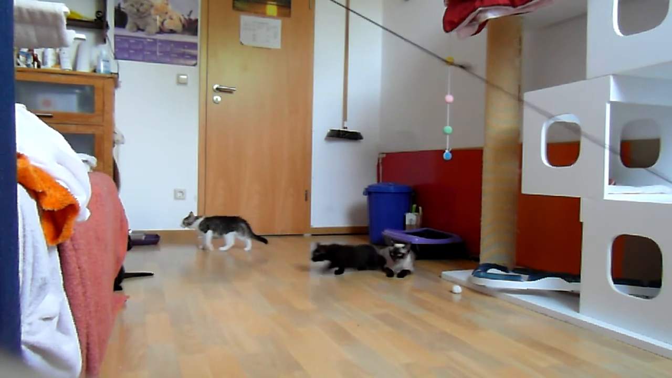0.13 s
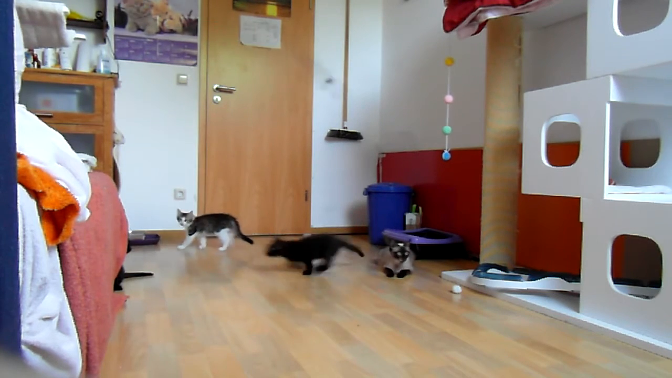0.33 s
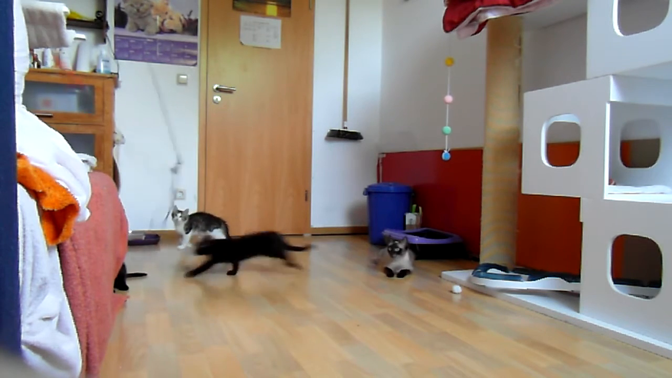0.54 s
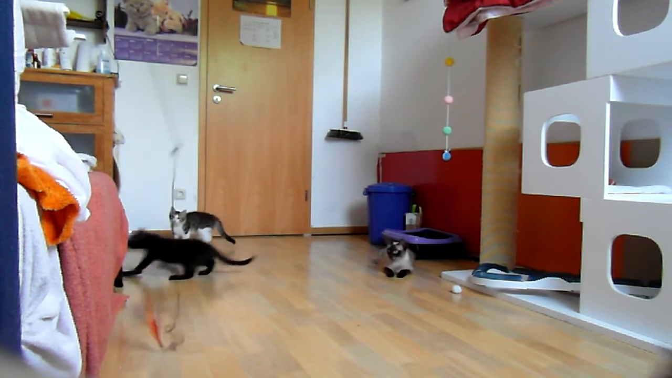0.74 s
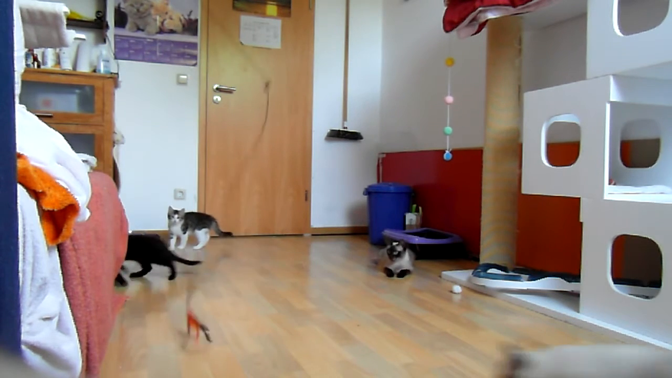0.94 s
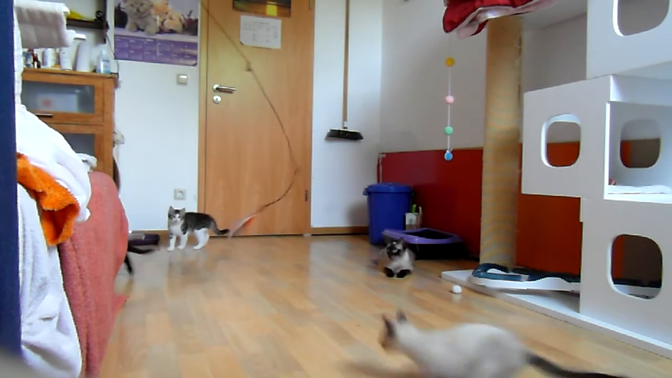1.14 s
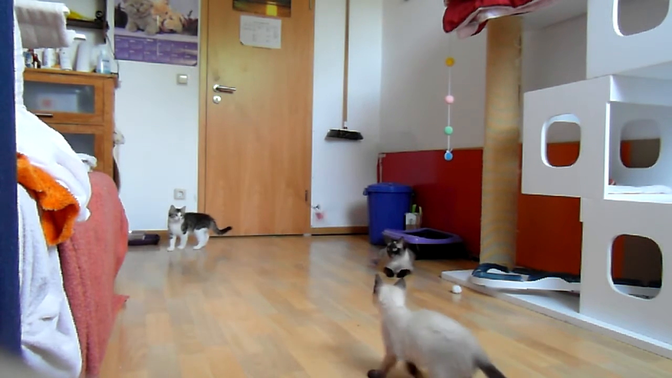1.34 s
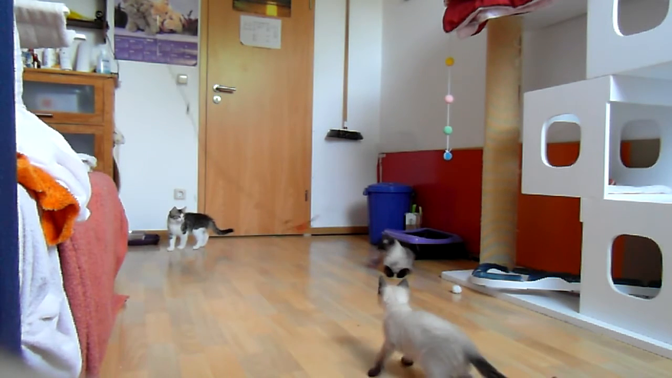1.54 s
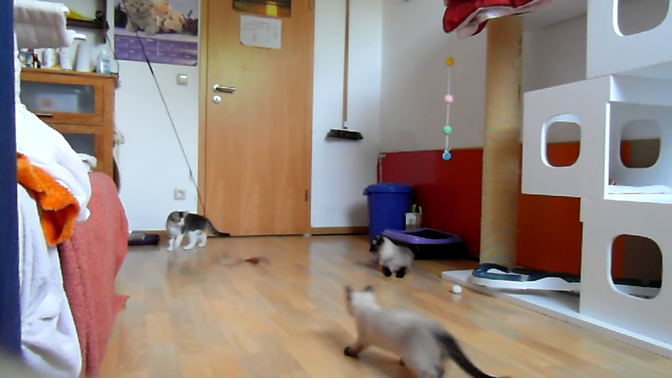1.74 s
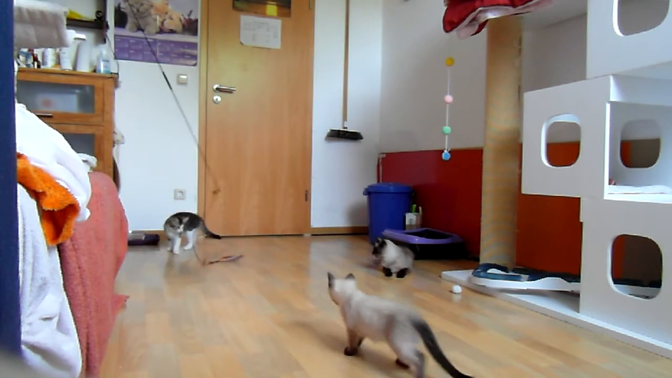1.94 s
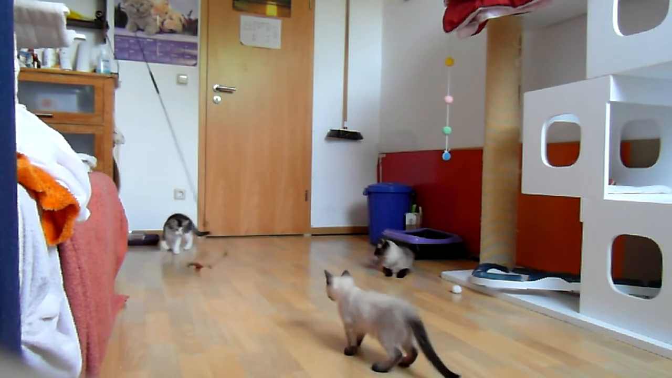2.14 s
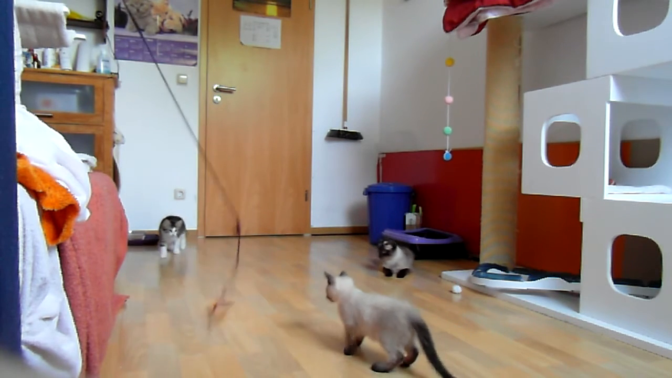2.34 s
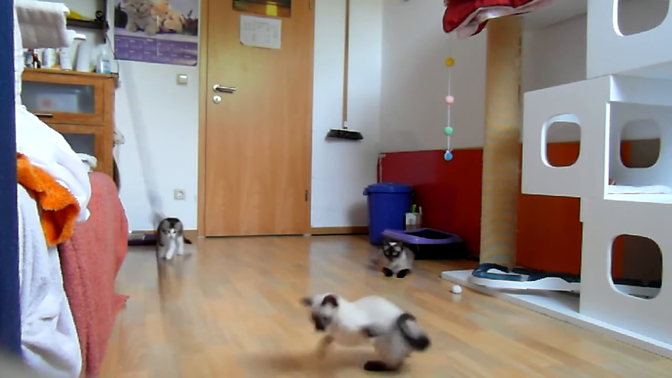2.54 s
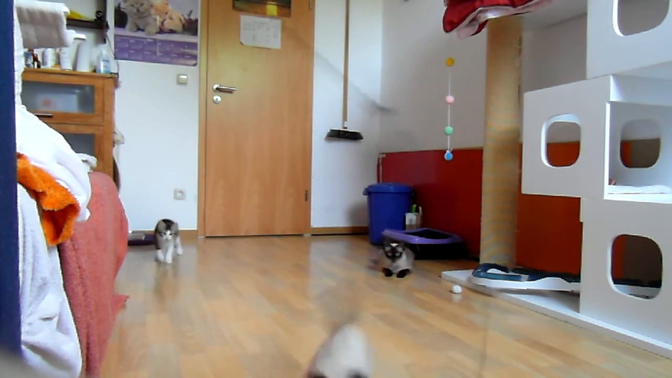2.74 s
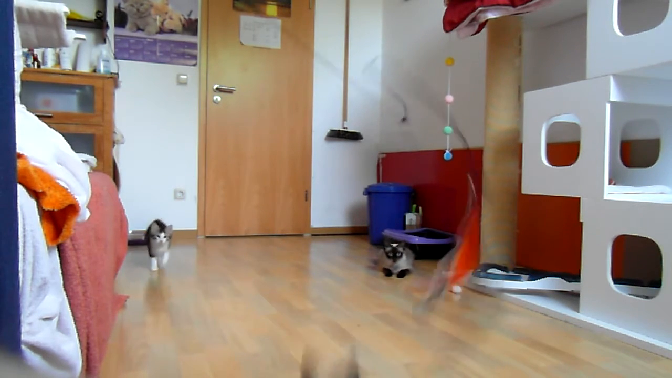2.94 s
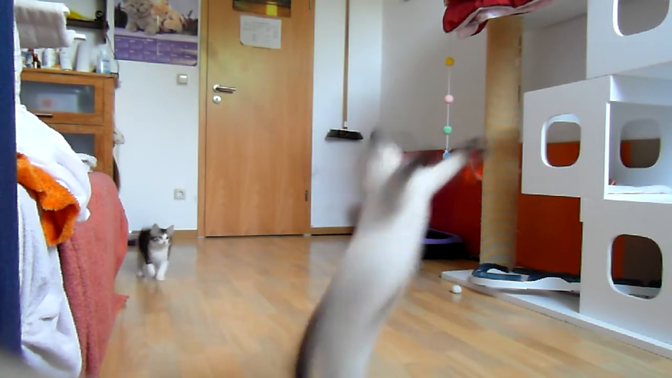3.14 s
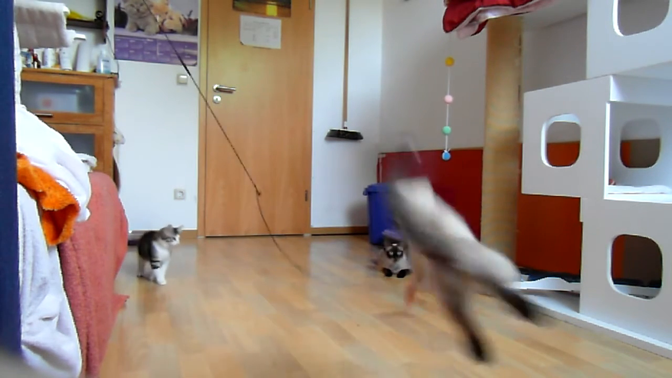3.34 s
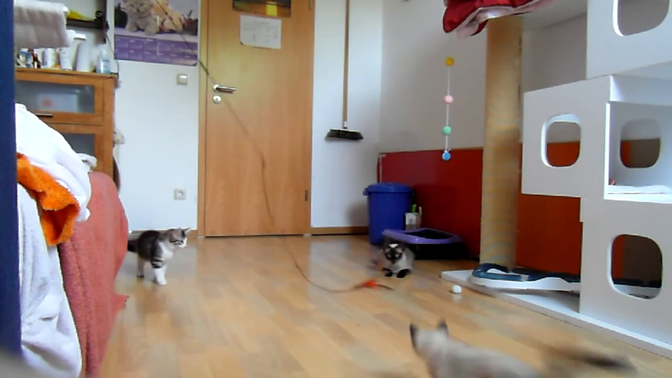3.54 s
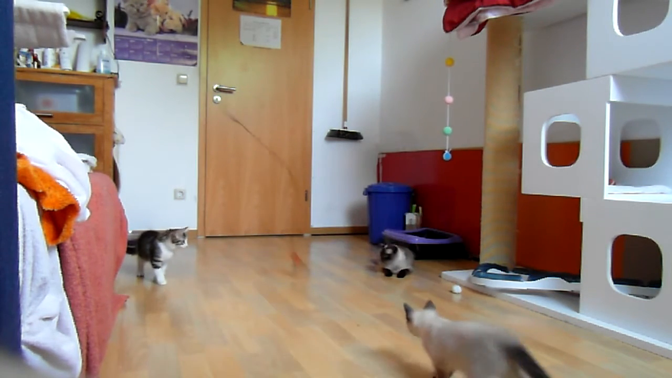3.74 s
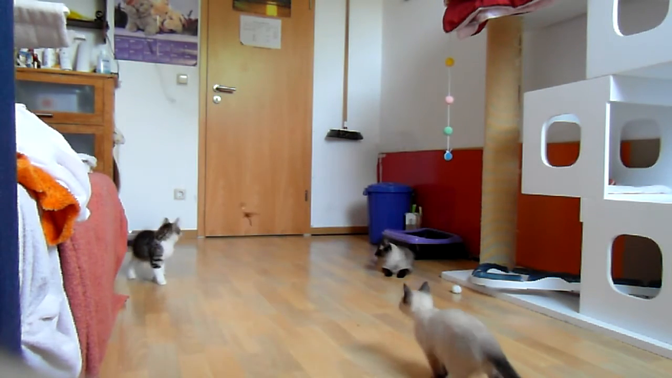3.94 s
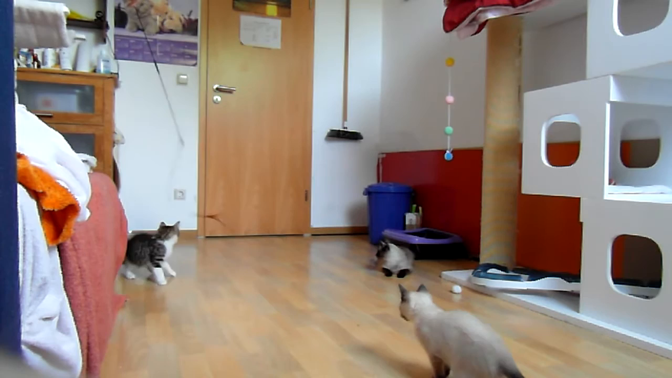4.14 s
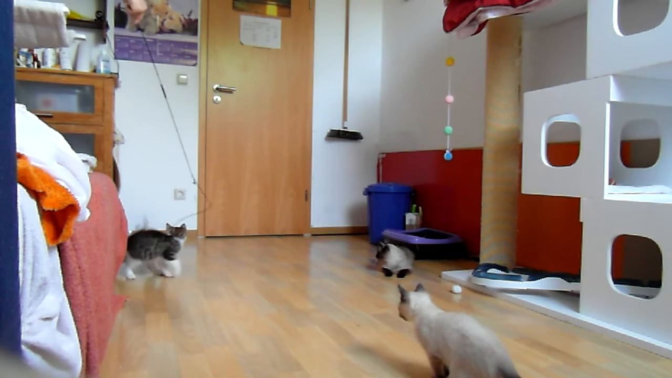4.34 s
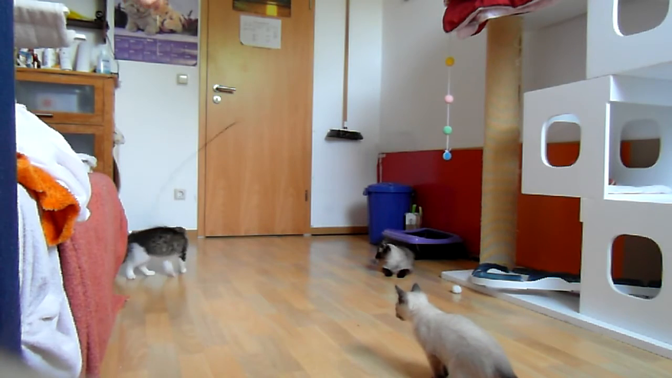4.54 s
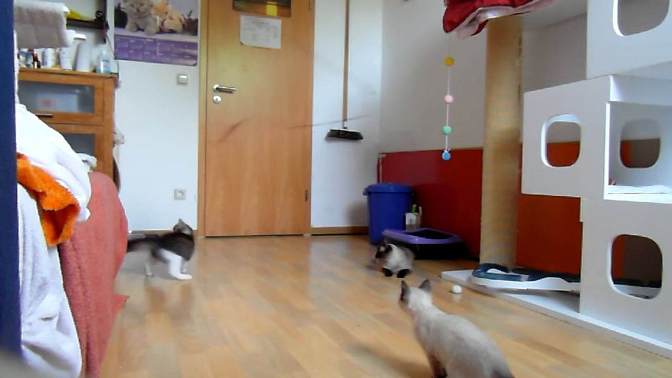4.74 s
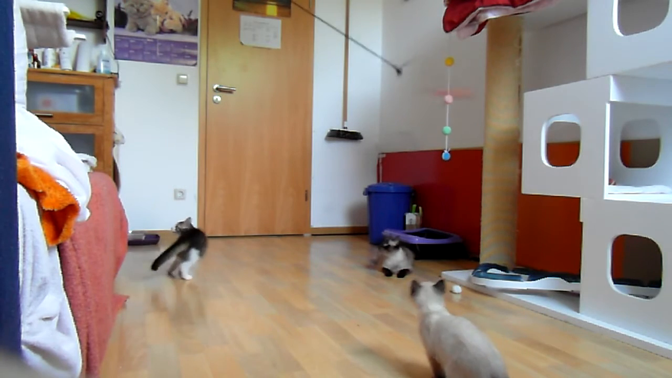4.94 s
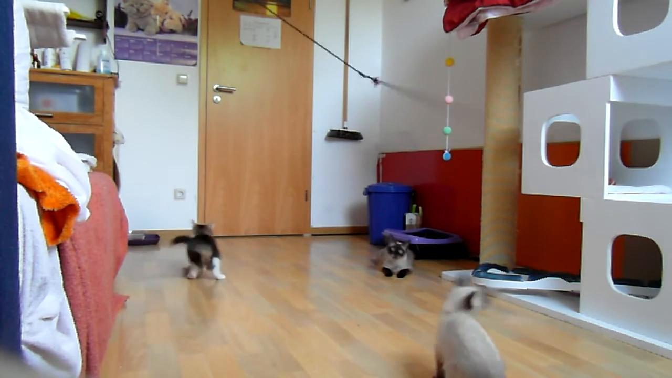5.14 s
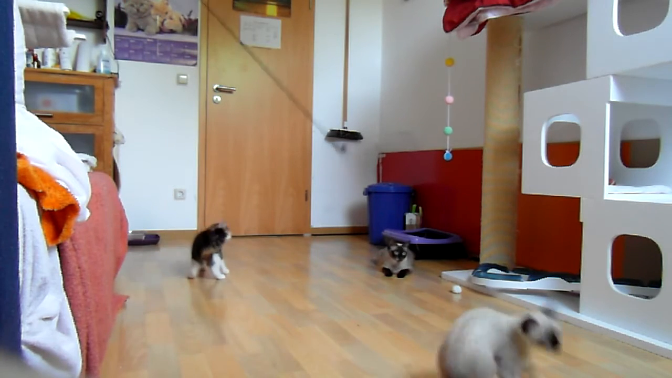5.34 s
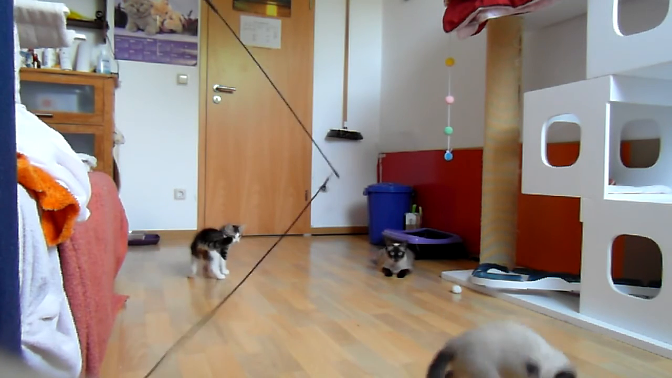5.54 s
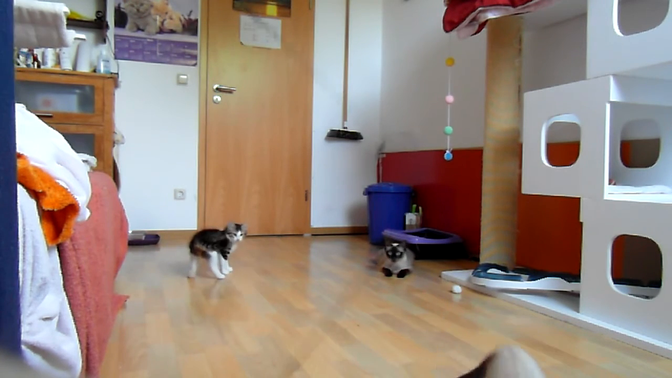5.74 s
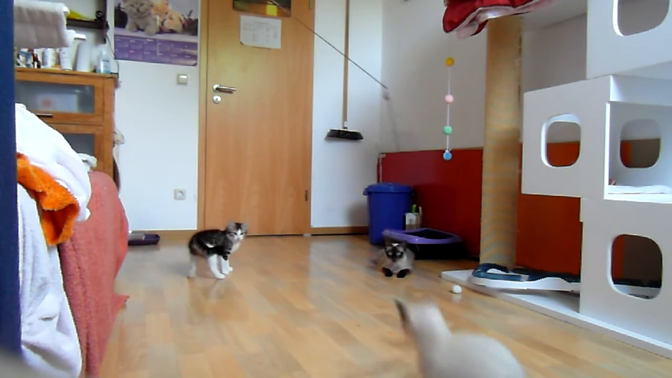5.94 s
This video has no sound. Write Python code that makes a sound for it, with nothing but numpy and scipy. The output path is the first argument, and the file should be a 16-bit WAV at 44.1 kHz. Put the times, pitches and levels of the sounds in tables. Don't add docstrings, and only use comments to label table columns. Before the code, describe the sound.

A small furnished room is heard from a microphone lying near the laminate floor: soft steady hiss, faint low rumble and muffled room murmur. At 0.14 s a kitten lands in a tumble, with a dull thud and clustered knocks; from 0.35 to 0.6 s claws drag brightly, squeak and tick. A quick bound at 1.0 s gives crisp claw cracks and a short skid, and another comes at 1.9 s. Faint scuffs follow near 2.6 s. At 2.95 s the hardest landing slams the boards, with a deep after-thump near 3.2 s. At 3.6 s claws skid sharply, then a hollow heavy thump lands at 3.7 s. Soft steps continue around 4 s, with light ticks at 4.6, 5.1, 5.6 and 5.75 s. Each sound drops abruptly into hiss. The murmur gradually grows, and a distant appliance's narrow hum swells near 5.9 s.

```python
import sys
import numpy as np
from scipy import signal
from scipy.fft import rfft, irfft, next_fast_len
from scipy.io import wavfile
from scipy.ndimage import uniform_filter1d, map_coordinates

SR = 44100
rng = np.random.default_rng(int(sys.argv[2]) if len(sys.argv) > 2 else 0)


def wav_out(sig):
    wavfile.write(sys.argv[1], SR, np.round(np.clip(np.atleast_2d(sig).T, -1, 1) * 32767).astype(np.int16))


def natural_amplitude(level_db):
    exponent = np.asarray(level_db, float) / 20
    return 10 ** exponent


N = 268304


def unit(x):
    return x / np.sqrt(np.mean(x ** 2) + 1e-20)


def along(points, hz):
    f, v = np.transpose(points)
    return np.interp(np.log(hz + 1), np.log(f + 1), v)


def filtered(x, response):
    m = next_fast_len(x.shape[-1] + 8192)
    spectrum = rfft(x, m) * response(np.fft.rfftfreq(m, 1 / SR))
    return irfft(spectrum, m)[..., :x.shape[-1]]


def modes(table):
    def response(f):
        total = 0
        for k, (centre, width, db) in enumerate(table):
            resonance = 1j * f * width / (centre * centre - f * f + 1j * f * width)
            total = total + (-1) ** k * natural_amplitude(db) * resonance
        return total
    return response


def swells(rows):
    t = np.arange(N) / SR
    return sum(natural_amplitude(db) * np.exp(-.5 * ((t - s) / half) ** 2) for s, db, half in rows)


def held(rise, hold, t60, fall, left_db):
    t = np.arange(SR // 2) / SR
    gate = natural_amplitude(left_db) + 1 / (1 + np.exp(np.clip((t - rise - hold) / fall, -50, 50)))
    return (1 - np.exp(-t / max(rise, 1e-4))) ** 2 * natural_amplitude(-60 * t / t60) * gate


def gritty(spread_db):
    clumps = np.repeat(rng.exponential(size=SR // 128 + 1), 64)[:SR // 2]
    return unit(rng.standard_normal(SR // 2) * natural_amplitude(spread_db * np.minimum(clumps, 3)))


def passed(table, low_hz, high_hz, spread_db, steady):
    def band(f):
        return np.abs(modes(table)(f)) / (1 + (low_hz / (f + 1)) ** 30) / (1 + (f / high_hz) ** 30)
    x = unit(filtered(gritty(spread_db), band))
    power = np.abs(uniform_filter1d(x ** 2, 500))
    return unit(x / (power + 0.04) ** (steady / 2))


def add(track, s, sound):
    track[round(s * SR):][:len(sound)] += sound


def rumble():
    # t/s, level/dB, half length/s
    rumble_swells = [
        (.25, -84, .2),
        (1.0, -90, 0.56),
        (1.96, -80, 0.13),
        (3.17, -70, 0.087),
        (3.8, -74, 0.14),
        (5.25, -80, 0.29),
        (6.1, -82, 0.14),
    ]

    def lowest_modes(f):
        return modes([(40, 25, -6), (78, 20, 0)])(f) / (1 + (f / 110) ** 4)
    mid, side = filtered(rng.standard_normal((2, N)), lowest_modes)
    rest_db = -92
    return (natural_amplitude(rest_db) + swells(rumble_swells)) * unit(mid + 0.28 * side * [[1], [-1]])


def hiss():
    # f/Hz, density level/dB
    spectrum = [(53, -33), (90, 0), (188, -5.5), (283, -6), (444, -4), (567, -7), (711, -4.5), (966, -5.5),
                (1260, -6), (1370, -7), (11000, -12.5), (12000, -17.5), (15500, -52), (22000, -120)]
    # f/Hz, correlation
    coherence = [(60, 1), (170, 0.65), (490, 0.47), (1410, 0.53), (4020, 0.32), (11500, -0.19)]

    def mid_side(hz):
        angle = np.arccos(np.clip(along(coherence, hz), -1, 1)) / 2
        return natural_amplitude(along(spectrum, hz)) * np.array([np.cos(angle), np.sin(angle)])
    mid, side = filtered(rng.standard_normal((2, N)), mid_side)
    return natural_amplitude(-65.5) * unit(np.array([mid + side, mid - side]))


def murmur():
    # f/Hz, width/Hz, level/dB
    air = [(145, 25, -3.5), (514, 23.4, -1), (566, 26, -5), (624.7, 22, -2), (982, 30, -1.5),
           (1062, 37, -3.5), (1380, 77, -11.5), (1824, 340, -14)]
    # t/s, level/dB
    course = [(0, -75.5), (1.6, -74), (3.2, -72.5), (3.8, -68.5), (5.5, -68), (6.08, -63.5)]
    # t/s, level/dB, half length/s
    stirs = [
        (.15, -66, 0.031),
        (2.0, -64, 0.064),
    ]
    drift_db = 1.3 * map_coordinates(rng.standard_normal(60), [np.arange(N) * 8 / SR]) - 2.0
    level_db = np.interp(np.arange(N) / SR, *np.transpose(course))
    noise = unit(filtered(rng.standard_normal(N), modes(air)))
    return (natural_amplitude(level_db) + swells(stirs)) * natural_amplitude(drift_db) * noise


def appliance():
    # t/s, level/dB, half length/s
    drone = [
        (5.9, -74, .45),
    ]
    # f/Hz, width/Hz, level/dB
    line = [(512, 12, 0), (1400, 30, -8)]
    return swells(drone) * unit(filtered(rng.standard_normal(N), modes(line)))


def room(x):
    # f/Hz, t60/s
    decay = [(100, 0.34), (500, 0.092), (2000, 0.19), (8000, 0.071)]
    hz, t, z = signal.stft(rng.standard_normal(SR // 2), SR, nperseg=256)
    tail = signal.istft(z * natural_amplitude(-60 * t / along(decay, hz)[:, None]), SR, nperseg=256)[1]
    return signal.fftconvolve(x, tail / np.linalg.norm(tail))[:N]


def skids():
    # f/Hz, width/Hz, level/dB
    scrape = [(1500, 220, -9), (2440, 400, 0.5), (3500, 1300, -6.5), (4170, 550, -2), (5250, 810, -7.5),
              (6370, 890, -6.5), (9000, 6300, -13), (11800, 2000, -12)]
    # t/s, level/dB, centre f/Hz, rise/s, hold/s
    slips = [(0.14, -48, 2360, 0.008, 0.075), (0.149, -56.5, 3900, 0.0044, 0.031),
             (.585, -60, 3360, 0.009, 0.088), (0.338, -56, 3030, 0.009, 0.17),
             (0.985, -56, 4930, .002, 0.073), (0.991, -47.5, 4250, 0.0053, 0.067),
             (1.931, -55, 4630, .0018, 0.027), (1.933, -45.5, 5100, 0.008, 0.052),
             (2.953, -47, 3450, .00074, 0.028), (2.985, -54, 3470, .004, .022),
             (2.954, -59.5, 5750, .0019, .021), (3.601, -41.5, 5130, 0.0055, 0.057),
             (3.609, -52.5, 2900, 0.0077, 0.07)]
    # t/s, level/dB, f/Hz, hold/s
    drags = [
        (.153, -46, 2650, .04),
        (0.352, -42.5, 4200, 0.075),
        (.385, -51, 3800, .065),
        (.362, -52.5, 2400, 0.071),
        (.532, -55.5, 3130, 0.02),
        (3.65, -53, 4500, 0.03),
        (4.634, -55.5, 5500, .012),
        (1.94, -47, 4870, 0.039),
        (1.0, -49.5, 4500, 0.028),
    ]
    # t/s, level/dB, low edge f/Hz, hold/s
    sprays = [
        (0.131, -60.5, 3100, 0.097),
        (0.336, -59.5, 4710, 0.14),
        (0.527, -56.5, 1680, 0.21),
        (0.573, -62, 3920, .08),
        (0.978, -57.5, 5550, 0.075),
        (1.93, -64, 6740, 0.035),
        (3.599, -59, 6800, 0.045),
        (5.627, -60.5, 2000, 0.19),
    ]
    # t/s, level/dB, hold/s
    scuffs = [
        (2.566, -71, 0.083),
        (2.676, -68, 0.036),
        (2.792, -65.5, 0.03),
        (4.644, -65, 0.04),
        (4.705, -69, .06),
        (5.139, -70, .073),
        (5.761, -66, 0.063),
    ]
    skid_spread, drag_spread = 1.322, 1.165
    slides = [(s, db, hz / skid_spread, hz * skid_spread, rise, hold) for s, db, hz, rise, hold in slips]
    slides += [(s, db, hz / drag_spread, hz * drag_spread, 0.013, hold) for s, db, hz, hold in drags]
    slides += [(s, db, hz, 11800, 0.006, hold) for s, db, hz, hold in sprays]
    slides += [(s, db, 2320, 7860, 0.0033, hold) for s, db, hold in scuffs]
    track = np.zeros(N + SR)
    for s, db, low_hz, high_hz, rise, hold in slides:
        friction = passed(scrape, low_hz, high_hz, spread_db=2.5, steady=0.38)
        add(track, s, natural_amplitude(db) * friction * held(rise, hold, t60=0.52, fall=0.0098, left_db=-28))
    return track[:N]


def catches():
    # t/s, peak level/dB, f/Hz
    plucks = [(.3745, -38, 4280), (.385, -34, 4300), (.408, -36, 4430), (.417, -40, 4200),
              (1.0023, -40, 4900), (1.0235, -36, 4870), (1.0295, -45, 4700), (1.955, -36, 4970),
              (1.965, -37, 4960), (1.977, -42, 5200), (2.955, -40, 4430), (2.9555, -44, 2940),
              (2.963, -45, 4430), (2.9625, -44, 2900), (3.001, -50, 4400), (3.005, -50, 3100),
              (3.618, -36, 4240), (3.637, -39, 4150)]
    track, t = np.zeros(N + SR), np.arange(SR // 40) / SR
    for s, db, hz in plucks:
        pluck = np.sin(2 * np.pi * hz * t) + 0.27 * np.sin(2 * np.pi * 1.13 * hz * t)
        add(track, s, natural_amplitude(db - 60 * t / 0.014) * (1 - np.exp(-t / 0.00043)) * pluck)
    return track[:N]


def ticks():
    # t/s, peak level/dB, f/Hz, left-right level/dB
    tips = [(0.366, -47, 4120, 3), (0.526, -30, 2520, 3), (.528, -34, 3000, 4), (0.5713, -33, 8000, 6),
            (.583, -35, 9500, 3), (0.589, -32, 5770, 0.5), (.596, -35, 9800, 3), (0.609, -35, 3200, 5),
            (0.9826, -28, 4850, 4), (0.9852, -26, 6460, 2), (1.841, -48, 1830, 2), (1.9285, -26.5, 5340, 3),
            (1.936, -34, 6500, 2), (2.6753, -39, 2850, 2), (2.952, -34, 1660, 0), (3.602, -33, 4530, 4),
            (3.7864, -47, 1700, 1.0), (4.642, -43, 5460, 2), (5.14, -39, 1850, 0), (5.63, -34, 4640, 3),
            (5.653, -41, 1820, 1.0), (5.7593, -37, 1400, 0.5)]
    pair, t = np.zeros((2, N + SR)), np.arange(SR // 40) / SR
    for s, db, hz, pan_db in tips:
        burst = 2.4 * natural_amplitude(-60 * t / 0.0022) + 0.37 * natural_amplitude(-60 * t / .03)
        ring = .7 * np.sin(2 * np.pi * hz * t) * natural_amplitude(-60 * t / 0.015)
        crack = rng.standard_normal(len(t)) * burst + ring
        add(pair[0], s, natural_amplitude(db - 15.5 + pan_db / 2) * crack)
        add(pair[1], s, natural_amplitude(db - 13 - pan_db / 2) * crack)
    return filtered(pair[:, :N], lambda f: (1j * f / (1100 + 1j * f)) ** 2 * 10500 / (10500 + 1j * f))


def knocks():
    # f/Hz, width/Hz, level/dB
    panel = [(300, 97, -11.5), (397, 23, 3.5), (480, 59, 1), (570, 30, 4), (652.6, 28, 3.5),
             (767, 260, -9.5), (975, 142, -0.5), (1370, 63, -3.5), (1810, 200, -4), (2380, 250, -5.5),
             (3100, 1200, -10)]
    # t/s, level/dB, reach f/Hz, hold/s
    pads = [(0.137, -46, 2050, 0.044), (0.349, -55, 2010, 0.018), (0.519, -64.5, 1190, 0.034),
            (0.551, -67, 1200, 0.13), (0.976, -58.5, 1060, 0.12), (1.236, -67, 800, 0.18),
            (1.837, -59, 1990, .04), (2.025, -67, 1200, 0.029), (2.753, -73, 1200, 0.073),
            (3.095, -62, 1090, 0.044), (3.989, -62, 1260, 0.068), (4.364, -66, 1430, 0.071),
            (4.632, -68, 1110, 0.074), (5.137, -60.5, 2000, 0.061), (5.583, -70, 1100, 0.066),
            (5.754, -68, 1120, 0.027), (5.954, -73, 1100, .14)]
    # t/s, level/dB, depth f/Hz, hold/s
    drums = [(0.157, -40, 374, 0.046), (0.197, -50, 412, 0.054), (.361, -44, 478, .125),
             (1.934, -51.5, 330, 0.057), (2.616, -67, 440, 0.083), (2.957, -41, 503, 0.02),
             (2.969, -47, 328, 0.074), (3.599, -47.5, 480, 0.105), (3.702, -38.5, 540, 0.07),
             (3.783, -53, 520, 0.038), (4.067, -67, 460, 0.088), (5.647, -53.5, 400, 0.059)]
    # t/s, level/dB, hold/s
    hollows = [
        (.985, -66, .09),
        (2.956, -46, 0.033),
        (3.111, -56.5, 0.12),
        (3.704, -38.5, 0.034),
        (3.73, -46, 0.1),
    ]
    # t/s, level/dB, reach f/Hz, hold/s
    raps = [(0.149, -44.5, 1860, 0.06), (0.198, -56, 2160, 0.037), (0.364, -57.5, 2120, 0.15),
            (0.983, -58.5, 3500, 0.078), (1.922, -59, 3900, 0.066), (2.954, -39.5, 1880, 0.014),
            (2.969, -51, 1940, 0.052), (3.599, -53.5, 2600, 0.065), (5.628, -59, 1200, 0.092),
            (5.628, -63, 2500, .08), (5.757, -65, 2500, .05)]
    # t/s, level/dB, f/Hz, hold/s
    rings = [
        (.595, -63, 1850, 0.043),
        (.6, -67, 1400, 0.051),
        (3.608, -57.5, 930, 0.077),
        (3.613, -51, 1730, 0.079),
        (3.689, -62, 1050, 0.099),
        (5.147, -57.5, 990, .065),
        (5.755, -61, 1340, 0.055),
    ]
    spread = 1.1
    contacts = [(s, db, 379, hz, hold) for s, db, hz, hold in pads]
    contacts += [(s, db, hz, 730, hold) for s, db, hz, hold in drums]
    contacts += [(s, db, 293, 513, hold) for s, db, hold in hollows]
    contacts += [(s, db, 830, hz, hold) for s, db, hz, hold in raps]
    contacts += [(s, db, hz / spread, hz * spread, hold) for s, db, hz, hold in rings]
    track = np.zeros(N + SR)
    for s, db, low_hz, high_hz, hold in contacts:
        rise = 0.00062 + 0.042 * hold
        knock = passed(panel, low_hz, high_hz, spread_db=0.5, steady=0.43)
        add(track, s, natural_amplitude(db) * knock * held(rise, hold, t60=0.59, fall=0.0046, left_db=-22.5))
    return track[:N]


def blows():
    # t/s, level/dB, t60/s, centre f/Hz, reach f/Hz
    impacts = [(.137, -50, .02, 1400, 3200), (.1445, -42, 0.034, 900, 3200), (.152, -41, .03, 900, 3200),
               (.158, -41, .04, 1000, 3200), (.163, -35, .08, 560, 3200), (.176, -40, .06, 560, 1200),
               (.196, -42, 0.066, 1000, 2000), (.365, -44, .08, 620, 720), (2.9548, -23, .045, 720, 2000),
               (2.9612, -25, .04, 720, 2000), (2.967, -29, .04, 560, 2000), (3.69, -47, .08, 550, 720),
               (3.70, -30, .11, 410, 700), (3.711, -36, 0.11, 505, 700), (3.786, -41, .05, 620, 900),
               (4.63, -62, .1, 400, 700), (5.1396, -49, .05, 990, 2000), (5.63, -54, 0.056, 990, 2000)]
    # f/Hz, level/dB
    struck = [(310, -5.5), (398, 2), (480, -2), (570, 1), (628, -1.5), (790, -2), (985, -9), (1375, -5.5),
              (1780, -0.5), (2360, -11), (2940, -6)]
    loss_db = 13
    rise_cycles = 2.2
    track, t = np.zeros(N + SR), np.arange(SR // 4) / SR
    for s, db, t60, centre_hz, reach_hz in impacts:
        ring = np.zeros(len(t))
        for hz, level in struck:
            mode_db = level - loss_db * abs(np.log2(hz / centre_hz)) + rng.normal(0, 1.6)
            ring += natural_amplitude(mode_db) / (1 + (hz / reach_hz) ** 30) * np.sin(2 * np.pi * hz * t)
        add(track, s, natural_amplitude(db - 60 * t / t60) * (1 - np.exp(-t * reach_hz / rise_cycles)) * ring)
    return track[:N]


def radiated(x):
    return filtered(x, lambda f: (1j * f / (55 + 1j * f)) ** 2)


def sways():
    # t/s, level/dB, hold/s
    shifts = [(0.128, -53, .04), (.60, -56, .042), (.99, -59, .034), (1.247, -64, 0.045), (1.884, -64, .05),
              (3.188, -32.5, 0.016), (3.212, -50, .077), (3.30, -64, .098), (3.747, -54, .064),
              (3.816, -53, .037), (4.017, -56, .05), (4.933, -63, .037), (5.168, -52, .036),
              (5.632, -57, .021)]
    track, t = np.zeros(N + SR), np.arange(SR // 2) / SR
    for s, db, hold in shifts:
        envelope = held(0.011, hold, t60=0.7, fall=0.044, left_db=-21.0)
        add(track, s, natural_amplitude(db) * np.sin(2 * np.pi * 77 * t) * envelope)
    return radiated(track[:N])


def thuds():
    # t/s, level/dB, board f/Hz, hold/s
    landings = [(.13, -44, 161, .01), (.14, -21, 158, 0.011), (.1527, -33, 158, .01),
                (.165, -36.5, 149.7, 0.055), (.195, -39, 163.5, 0.045), (.37, -45.5, 162, 0.018),
                (.385, -39.5, 146, 0.016), (.425, -42.5, 152, 0.012), (.455, -52, 128, 0.027),
                (1.846, -54.5, 155, 0.02), (1.871, -49, 125, 0.037), (1.90, -47, 145, 0.037),
                (2.967, -24, 201, 0.013), (2.996, -40, 187, 0.017), (3.043, -44, 136, 0.081),
                (3.115, -37.5, 126, 0.07), (3.186, -35, 163.7, 0.026), (3.215, -37, 137.6, 0.1),
                (3.698, -33.5, 153, 0.033), (3.745, -38, 150.4, 0.072), (3.815, -46.5, 154.5, 0.051),
                (5.147, -47, 138, 0.011), (5.167, -49.5, 145, 0.041), (5.629, -58, 166, 0.014)]
    # t/s, level/dB, board f/Hz
    steps = [(0.251, -53, 152), (0.551, -53, 128), (.60, -50, 148), (.68, -63.5, 126), (0.991, -55, 151),
             (1.246, -55, 155.4), (1.36, -64.5, 156), (2.029, -70, 169), (3.87, -60, 145),
             (4.015, -47.5, 137.4), (4.03, -54, 105), (4.07, -58, 140), (4.362, -61, 147.4),
             (4.732, -59.5, 149), (4.93, -56.5, 145), (4.966, -54.5, 145), (5.204, -51.5, 122),
             (5.531, -70, 137)]
    contacts = [(s, db, hz, 0.0045, hold) for s, db, hz, hold in landings]
    contacts += [(s, db, hz, 0.006, 0.049) for s, db, hz in steps]
    track, t = np.zeros(N + SR), np.arange(SR // 2) / SR
    for s, db, hz, rise, hold in contacts:
        wander = 0.02 * np.cumsum(rng.standard_normal(len(t)))
        board = np.sin(2 * np.pi * hz * t + wander)
        board += natural_amplitude(-12.5) * np.sin(2 * np.pi * 1.36 * hz * t - wander)
        add(track, s, natural_amplitude(db) * board * held(rise, hold, t60=0.36, fall=0.0035, left_db=-24.5))
    return radiated(track[:N])


def scene():
    # f/Hz, level/dB
    side_level = [(40, -11), (80, -27), (150, -30.5), (500, -21.5), (2000, -18), (5000, -15), (10000, -4.5)]
    paws = thuds() + sways() + blows() + knocks() + skids() + catches()
    tips = ticks()
    mid = paws + natural_amplitude(-16) * room(paws + tips.mean(axis=0))
    late = np.roll(paws, 150)
    side = filtered(late + natural_amplitude(2.5) * room(paws), lambda hz: natural_amplitude(along(side_level, hz)))
    pair = mid * natural_amplitude([[.9], [-.9]]) + side * [[1], [-1]] + tips
    pair[0] = filtered(pair[0], lambda hz: np.exp(-2j * np.pi * hz * 3.2e-5))
    return pair + hiss() + (murmur() + appliance()) * natural_amplitude([[.6], [-.6]]) + rumble()


def top_cut(x):
    return signal.sosfilt(signal.butter(12, 12110, fs=SR, output="sos"), x)


def record(dry):
    mix = filtered(dry, lambda hz: hz < 11530)
    return top_cut(mix)


dry = scene()
out = record(dry)
wav_out(out)
```